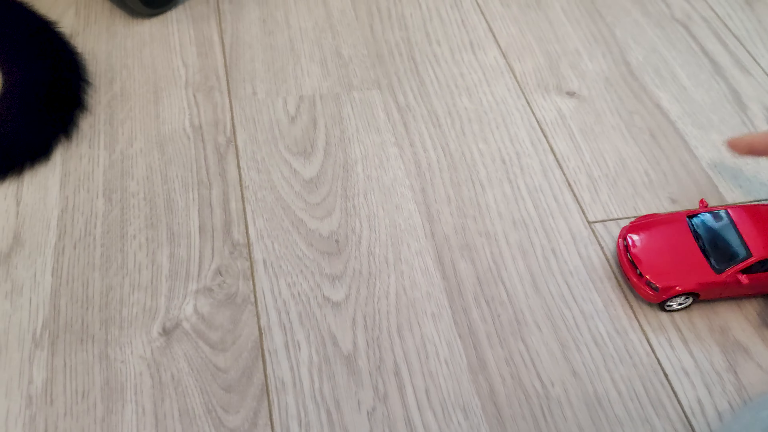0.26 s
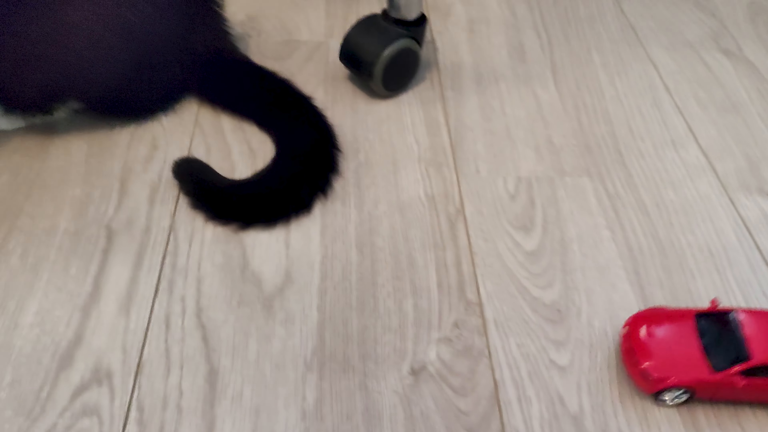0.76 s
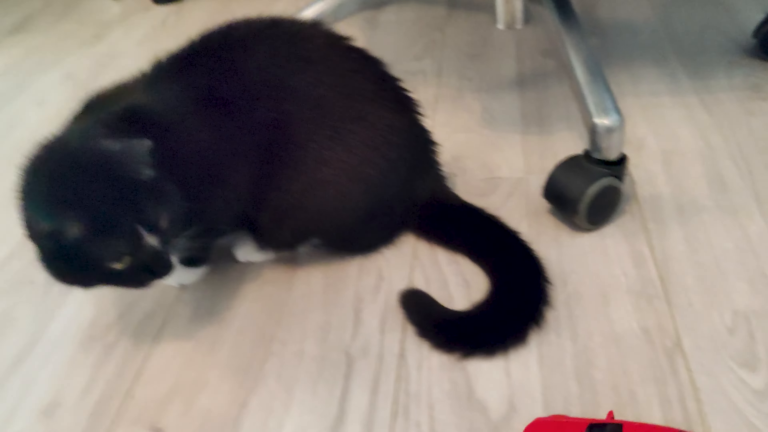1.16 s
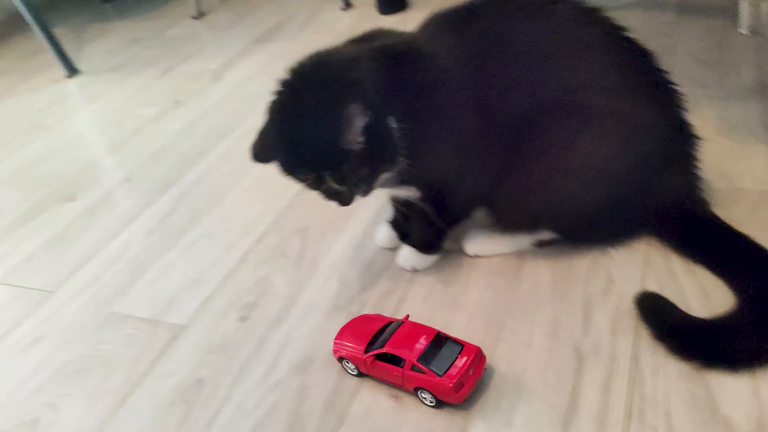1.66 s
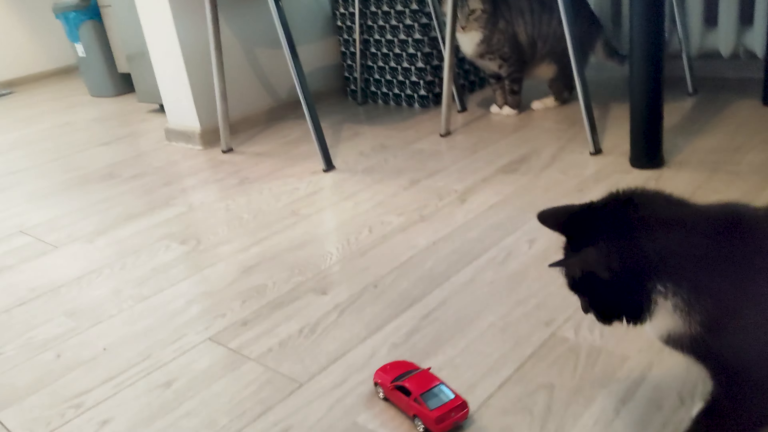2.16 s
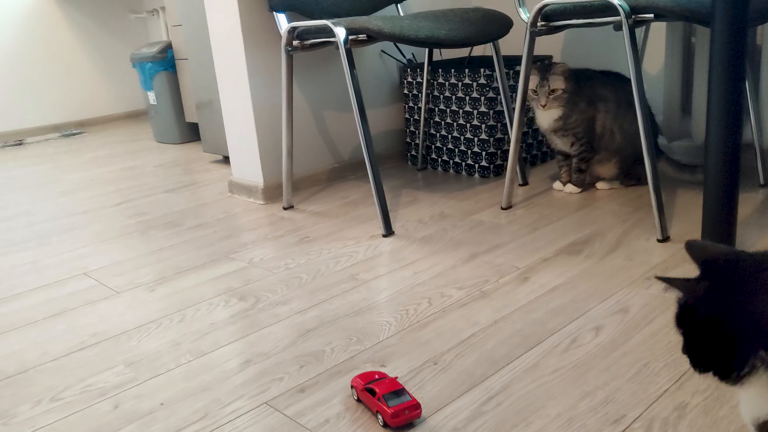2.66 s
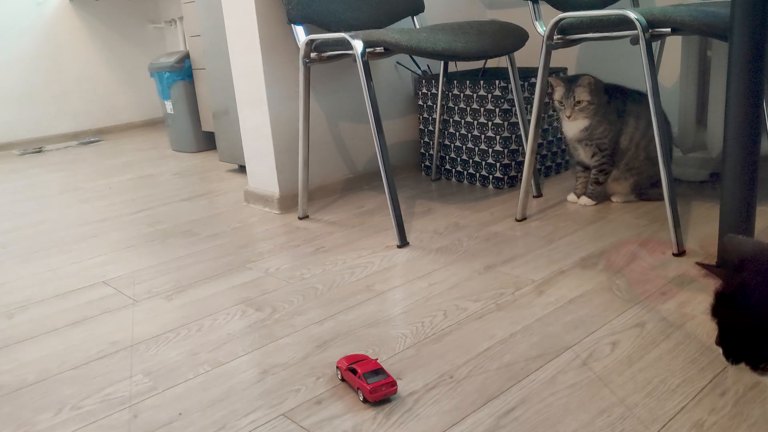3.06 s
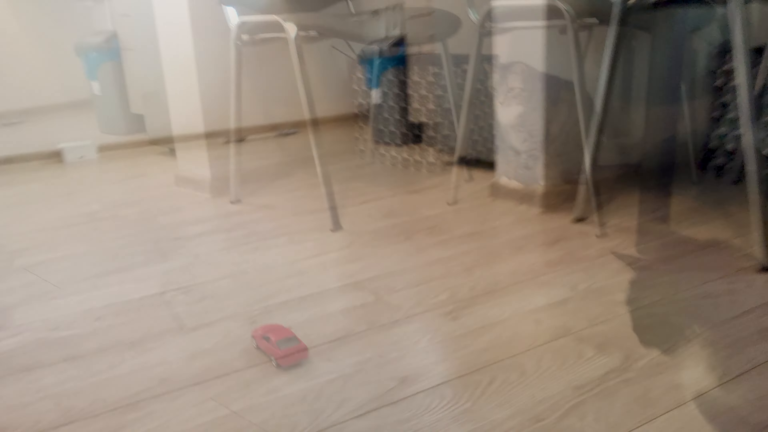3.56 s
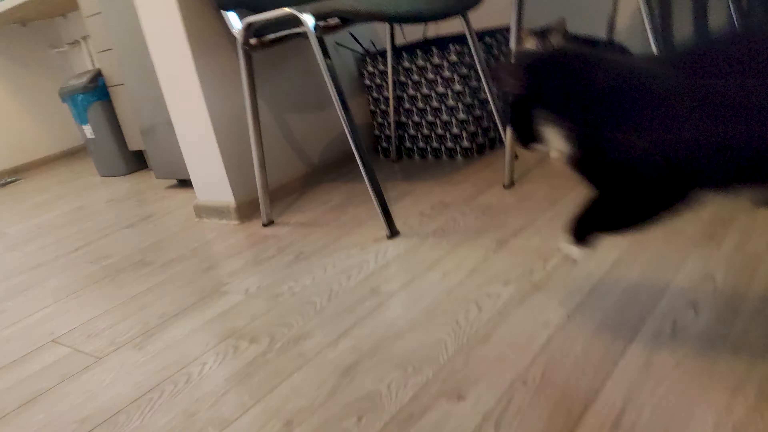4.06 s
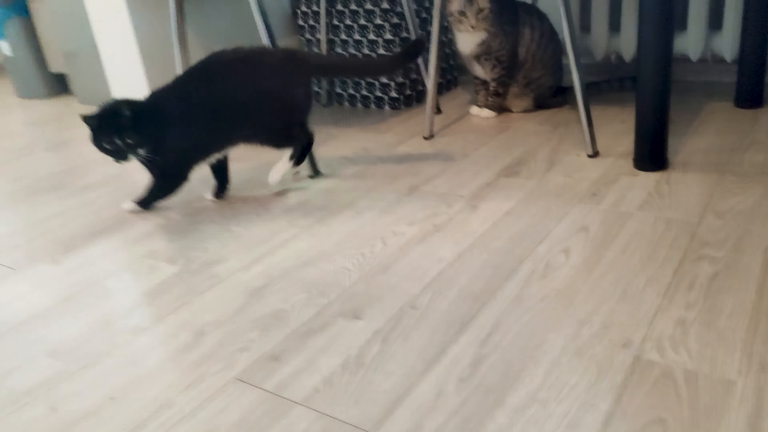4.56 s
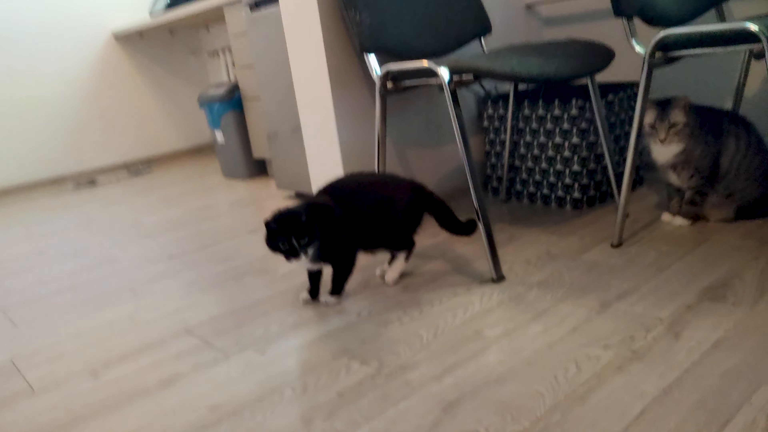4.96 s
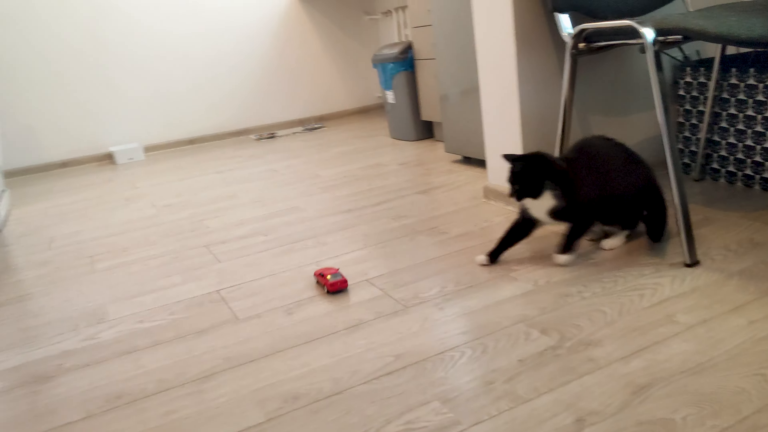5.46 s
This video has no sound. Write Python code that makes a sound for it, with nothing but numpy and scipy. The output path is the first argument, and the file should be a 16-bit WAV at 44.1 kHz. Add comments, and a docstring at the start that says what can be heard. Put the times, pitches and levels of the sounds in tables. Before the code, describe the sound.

At about 0.3 seconds a small toy car is set down on a laminate floor with a few light clacks. From 0.7 seconds it rolls off with a gritty rattle, its hollow body clacking and the boards knocking softly at the joints. The sharpest bumps come between 1.5 and 2.2 seconds. It then slows and grows quieter, ending in faint wheel ticks by 3.3 seconds. From about 3.5 seconds its spring is wound: a few soft clicks, then a quick run of bright ratchet clicks that slow down until 4 seconds. The sound fades to a brief silence. At about 4.5 seconds it cuts back in on a loud, close roll, with rattling and hollow knocks that build until the end at 5.7 seconds. The room has a short, slight echo, and faint hiss and soft microphone handling rumble lie beneath.

```python
"""A small toy car is set down on a laminate floor in a room and rolls off, rattling over the joints.
Grit under the wheels and each bump force its hollow body and the floor boards into resonance.
Its spring ratchet is wound with a run of slowing clicks, each an impact of pawl on tooth.
The sound fades out, then cuts back in on a loud close roll. Faint hiss and rumble lie beneath."""
import sys
import numpy as np
from scipy import signal
from scipy.io import wavfile
from scipy.ndimage import uniform_filter1d

SR = 44100
rng = np.random.default_rng(int(sys.argv[2]) if len(sys.argv) > 2 else 0)


def master(y):
    """Save y as 16-bit WAV."""
    cut = np.clip(np.atleast_2d(y).T, -1, 1)
    pcm = np.round(cut * 32767)  # scale
    wavfile.write(sys.argv[1], SR, pcm.astype(np.int16))


N = 251811
TIME = np.arange(N) / SR


def gain_of(db):
    """Amplitude ratio of a level in decibels."""
    return 10 ** (np.asarray(db) / 20)


def unit_rms(x):
    """Normalisation to unit mean power."""
    return x / np.sqrt(np.mean(x ** 2) + 1e-20)


def at_hz(points, hz):
    """Interpolation on a logarithmic frequency axis."""
    f, value = np.transpose(points)
    return np.interp(np.log(hz + 1), np.log(f + 1), value)


def curves(rows):
    """Linear interpolation in time, one curve for each column after the first."""
    s, *columns = np.transpose(rows)
    return [np.interp(TIME, s, column) for column in columns]


def gated_curves(tables, lead_s=.012):
    """A gate that opens during each table, and the tables' curves."""
    tables = [[(rows[0][0] - lead_s, *rows[0][1:]), *rows] for rows in tables]
    inside = sum((TIME >= rows[0][0]) * (TIME <= rows[-1][0]) for rows in tables)
    return uniform_filter1d(np.minimum(inside, 1.), 64), curves(sum(tables, []))


def filtered(x, order, hz, kind="band"):
    """Causal filtering with a maximally flat passband."""
    return signal.sosfilt(signal.butter(order, hz, kind, fs=SR, output="sos"), x)


def colour(x, spectrum, lo_hz, hi_hz, modes=()):
    """Source-filter principle: x excites a minimum-phase band of unit energy with resonant peaks."""
    hz = abs(np.fft.fftfreq(8192, 1 / SR)) + 1
    peaks = sum(gain_of(db) / (1 + (2 * (hz - f) / width) ** 2) for f, width, db in modes)
    edges = np.sqrt((1 + (lo_hz / hz) ** 36) * (1 + (hz / hi_hz) ** 36))
    log_gain = np.log(gain_of(at_hz(spectrum, hz)) * (1 + peaks) / edges + 1e-5)
    taps = np.fft.ifft(np.exp(log_gain - 1j * signal.hilbert(log_gain).imag)).real[:2048]
    return signal.oaconvolve(x, taps[None] / np.linalg.norm(taps))[:, :N]


def sides(pan_db):
    """Level panning: two gains, the left pan_db above the right."""
    return gain_of(np.array([pan_db / 2, -pan_db / 2]))


def noise_pair(count, correlation):
    """Partial coherence: each microphone faces another side of the shaking shell."""
    a, b = rng.standard_normal((2, count))
    return np.array([a, correlation * a + np.sqrt(1 - correlation ** 2) * b])


def blows(s, db, pan_db, shake_s=.0037, rise_s=.00037, crack_db=-60):
    """Impact excitation: a spike at first contact, then exponentially decaying noise."""
    out, t = np.zeros((2, N + 3000)), np.arange(3000) / SR
    envelope = np.exp(-t / shake_s) * (1 - np.exp(-t / rise_s))
    for at, level_db, side_db in np.broadcast(s, db, pan_db):
        shake = noise_pair(3000, correlation=.11) * envelope
        shake /= np.sqrt((shake ** 2).sum(1, keepdims=True) / (envelope ** 2).sum()) * envelope.max()
        blow = shake + gain_of(crack_db) * (t == 0)
        out[:, round(at * SR):][:, :3000] += gain_of(level_db) * sides(side_db)[:, None] * blow
    return out[:, :N]


def rings(s, db, hz, pan_db, t60):
    """Free vibration: each tap starts a damped sinusoid that rises within a cycle."""
    out, t = np.zeros((2, N + 3000)), np.arange(2000) / SR
    for at, level_db, f, side_db, life in np.broadcast(s, db, hz, pan_db, t60):
        envelope = gain_of(level_db - 60 * t / life) * np.minimum(t * f / .8, 1)
        tone = envelope * np.sin(2 * np.pi * f * t)
        out[:, round(at * SR):][:, :len(t)] += sides(side_db)[:, None] * tone
    return out[:, :N]


# Hiss spectrum. Each row: frequency in Hz, relative level in dB.
HISS_SPECTRUM = [(88, -25.5), (150, -22.5), (439, -23.5), (504, -22), (1260, -25), (1690, -36.5),
                 (1980, -11), (2360, -7.5), (2500, -31.5), (3700, -34), (4000, -11), (9080, -9.5),
                 (16000, -20)]

def noise_floor(hiss_db=-70, hum_db=-93, hum_end_s=3.42):
    """Stationary noise: room and microphone hiss, with a narrow-band hum until the winding starts."""
    hiss = colour(rng.standard_normal((2, N)), HISS_SPECTRUM, 120, 17000)
    hum = unit_rms(filtered(hiss[0], 3, [135, 170])) * (TIME < hum_end_s)
    return gain_of(hiss_db) * hiss + gain_of(hum_db) * hum


# Low wobble, in two stretches. Each row: time in seconds, steady level in dB, thud level in dB.
WOBBLE = [
    [(0.0, -85, -91), (0.24, -75, -99), (0.29, -81, -76), (0.48, -85, -85), (0.54, -88, -100),
     (0.82, -89, -83), (0.89, -86, -97), (1.06, -80, -73), (1.28, -94, -72.5), (1.33, -91, -85),
     (1.55, -88, -67.5), (1.7, -72, -76.5), (2.39, -88, -88), (2.47, -87, -73), (2.57, -89, -89),
     (2.67, -84, -73), (2.76, -83, -102), (2.9, -86, -86), (2.96, -88.5, -97.5), (3.2, -91.5, -92.5),
     (3.4, -100, -83.5), (3.42, -101, -97)],
    [(4.45, -90, -72), (4.474, -83.5, -65), (4.502, -75, -79), (4.576, -80, -48.5), (4.62, -73, -61),
     (4.688, -74, -70), (4.702, -75, -61), (4.776, -74, -62), (4.8, -70, -77), (4.884, -74, -73),
     (4.912, -74, -63), (5.004, -74, -90), (5.092, -83, -71), (5.172, -85, -75), (5.218, -79, -64),
     (5.284, -83, -80), (5.322, -87, -76), (5.376, -87, -87), (5.478, -88, -55), (5.508, -89, -55),
     (5.65, -84, -45), (5.71, -79, -56)],
]
# Soft handling thumps. Each row: centre in seconds, deepest band in dB, hum band in dB.
HANDLING = [(0.051, -71, -100), (0.321, -67, -85), (.44, -92, -71), (0.641, -58, -91), (.9, -66.5, -99),
            (1.3, -93, -78), (1.48, -76, -70.5), (1.6, -72, -94), (1.94, -82, -75), (2.13, -73.5, -75),
            (2.21, -79, -69), (2.34, -84, -80), (2.48, -88, -70), (2.6, -70, -94), (2.77, -77, -99),
            (3.141, -70, -88), (3.93, -76, -97), (4.501, -65, -89), (4.62, -60, -84), (4.7, -51, -85),
            (4.97, -67, -94), (5.1, -69, -90), (5.5, -85, -65), (5.7, -67, -76)]

def rumble(thump_s=.044):
    """Amplitude modulation: low bands of noise wobble, and swell at each handling thump."""
    on, (steady_db, thud_db) = gated_curves(WOBBLE)
    s, *thump_db = np.transpose(HANDLING)
    t = TIME[::100]
    swells = gain_of(thump_db) @ np.exp(-((t - s[:, None]) / thump_s) ** 2)
    deep_swell, hum_swell = (np.interp(TIME, t, swell) for swell in swells)
    apart, common = rng.standard_normal((2, N)), rng.standard_normal(N)
    deep = unit_rms(filtered(apart, 3, [12, 36])) * (gain_of(steady_db) + deep_swell)
    hum = unit_rms(filtered(common + .19 * apart, 3, [50, 110]))
    hum *= gain_of(steady_db - 12.5) + hum_swell
    far, near = (unit_rms(filtered(common + .3 * apart, 4, hz)) for hz in ([148, 320], [142, 223]))
    thud = np.where(TIME < WOBBLE[-1][0][0], far, near)  # deeper when the car runs close
    return on * (deep * sides(5.8)[:, None] + hum + gain_of(thud_db) * thud)


# Vibration in four stretches: set down, rolling away, wound up, rolling close.
# Each row: time in seconds, then shell, treble and board levels in dB.
ROLL_LEVELS = [
    [(.267, -63, -66, -64), (.295, -44, -66, -60), (.33, -43, -68, -56), (.45, -83, -96, -85),
     (.505, -63.5, -51.5, -64.5), (.585, -102, -99, -90), (.66, -66, -62, -79)],
    [(.69, -65, -68, -73), (.75, -45.5, -53, -70), (.87, -50.5, -85, -62), (.93, -46, -50, -66),
     (.97, -47.5, -90, -56.5), (1.12, -43.5, -56, -45.5), (1.25, -48.5, -51, -47), (1.36, -46, -57, -53),
     (1.47, -43.5, -49.5, -47.5), (1.6, -41.5, -50.5, -48), (1.7, -44, -73, -43.5), (1.81, -50, -52, -47.5),
     (1.87, -38, -51.5, -50), (2.0, -51.5, -56, -54.5), (2.16, -37.5, -44, -51), (2.38, -58, -53, -61.5),
     (2.47, -49.5, -51.5, -69), (2.62, -63, -51.5, -68), (2.73, -69, -56, -72), (3.0, -102, -61.5, -105),
     (3.12, -70, -62.5, -89), (3.2, -107.5, -72.5, -104), (3.41, -99, -72.5, -97)],
    [(3.43, -63.5, -57, -65), (3.465, -61, -59, -55.5), (3.506, -58.5, -63, -54.5), (3.56, -61.5, -62, -54),
     (3.63, -61, -56, -67.5), (3.67, -59.5, -52.5, -70.5), (3.724, -60, -56, -83), (3.732, -46.5, -52, -75),
     (3.78, -45, -46, -70), (3.84, -49.5, -47, -64), (3.92, -48, -53.5, -69), (4.01, -51, -55.5, -79),
     (4.05, -65.5, -69, -70), (4.14, -55, -69.5, -110), (4.25, -100, -91, -112)],
    [(4.36, -30.5, -41, -52.5), (4.46, -38, -44.5, -48.5), (4.55, -37.5, -50, -39.5),
     (4.63, -34.5, -49, -40.5), (4.75, -36, -44, -40), (4.87, -35.5, -41.5, -35), (4.91, -32.5, -43.5, -33),
     (4.945, -31, -35.5, -26), (4.99, -29, -38, -32.5), (5.04, -30, -40, -33), (5.09, -27.5, -32, -32.5),
     (5.15, -30.5, -38.5, -32.5), (5.195, -28.5, -34.5, -32.5), (5.225, -26.5, -34, -24),
     (5.27, -28.5, -30, -27.5), (5.34, -28, -33, -34.5), (5.375, -26.5, -31, -30.5),
     (5.41, -22.5, -31, -45), (5.45, -21.5, -27, -34.5), (5.5, -24.5, -32.5, -37.5),
     (5.55, -24.5, -29.5, -32.5), (5.61, -23.5, -31, -33.5), (5.67, -25, -30, -31), (5.71, -28, -29.5, -40)],
]
# Wheel contact. Each row: start in seconds, finest grit over the treble in dB,
# left over right in dB, ratio of smooth rub to taps.
CONTACT = [(0, -28, -1.5, 0.84), (.68, -15, -3.5, 0.96), (2.3, -12.5, -3, 1.1), (3.42, 0.5, -3, 1.5),
           (4.301, -9.5, -2.5, 1.6), (4.88, -9, -1.5, 5.1)]
# The car's place on the boards. Each row: time in seconds, board resonance in Hz, its skirt over
# its core in dB, chassis drone over the shell in dB, hollowness (ring over rattle) in dB.
PLACES = [(.27, 760, 14, -4.5, -7), (.6, 660, 11, 6, -2), (0.749, 640, 27, -6.5, -6),
          (.85, 677, 20, -7, -4), (.95, 713, 15, -10.5, -5), (1.07, 672, 15, -7, -5.5),
          (1.2, 604, 40.5, -6.5, 1), (1.5, 520, 18, -9, -2), (1.75, 526, -19, -18.5, -2.5),
          (2.0, 508, -14, -34, -2), (2.2, 521, -38, -32, -0.5), (2.45, 480, -27, -34, -4),
          (2.64, 500, -39, -32, 6.5), (2.8, 490, -15, -27, -7), (3.1, 453, -8.5, -11.5, -1.5),
          (3.41, 330, -8.5, -23.5, 2), (3.501, 430, -1.5, -23, -1), (3.72, 448, -7, -21, 2),
          (3.8, 617, 3, -20, -9), (4.3, 624, -14.5, -38, -2), (4.459, 521, 16.5, -12.5, -7.5),
          (4.6, 505, 8, -7.5, 0.5), (4.75, 510, 22, -10.5, -4.5), (4.9, 494, -14, -8, 0),
          (5.06, 437, 17.5, -10, -1.5), (5.22, 434, -1.5, -11.5, -2), (5.4, 451, -5.5, -13.5, 0),
          (5.48, 385, 28, -11.5, -3.5), (5.57, 366, 30, -11, -2), (5.67, 318, 20, -12, -0.5)]

def rolling():
    """A moving source: level, side and resonance vary along the car's path."""
    car = {}
    car["on"], (car["shell_db"], car["treble_db"], car["board_db"]) = gated_curves(ROLL_LEVELS)
    start, *contact = np.transpose(CONTACT)
    stretch = np.searchsorted(start, TIME, "right") - 1
    car["fine_db"], car["pan_db"], car["smooth"] = (column[stretch] for column in contact)
    car["board_hz"], car["skirt_db"], car["drone_db"], car["hollow_db"] = curves(PLACES)
    return car


def grit(per_s, spread_db, smooth, decay_s=.0018):
    """Shot noise: wheels meet grain and dust in random, uneven taps over a smoother rub."""
    taps = gain_of(spread_db * np.minimum(rng.exponential(1, N), 2.5)) * (rng.random(N) < per_s / SR)
    chatter = signal.lfilter([1], [1, -np.exp(-1 / (decay_s * SR))], taps)
    envelope = (smooth + unit_rms(chatter)) / np.sqrt(smooth ** 2 + smooth + 1)
    return unit_rms(envelope * noise_pair(N, correlation=.13))


def settling(s, db, settle_s, share_db=-12):
    """Damping: the envelope of loose parts' chatter falls exponentially after each bump."""
    out, t = np.zeros(N + 9000), np.arange(9000) / SR
    for at, level_db, tau in zip(s, db, settle_s):
        out[round(at * SR):][:9000] += gain_of(level_db + share_db) * np.exp(-t / tau)
    return out[:N]


def wander(depth_db=1.5, per_s=30):
    """Random modulation: a gain that makes a part rattle now more, now less."""
    return gain_of(depth_db * np.interp(TIME * per_s, np.arange(600), rng.standard_normal(600)))


def rocking_panels(x, depth_db=3, patch_hz=260, patch_s=.06):
    """Spectral modulation: as the car rocks, other panels take up the shaking, in random patches."""
    hz, t, spectrum = signal.stft(x, SR, nperseg=512, noverlap=384)
    patches = rng.standard_normal((len(t), len(hz))).T
    patches = uniform_filter1d(patches, round(patch_hz / hz[1]), axis=0)
    patches = uniform_filter1d(patches, round(patch_s / t[1]), axis=1)
    gain = unit_rms(gain_of(depth_db * unit_rms(patches)))
    return signal.istft(spectrum * gain, SR, nperseg=512, noverlap=384)[1][:, :N]


# Bumps. Each row: start in seconds, shell level in dB, treble and boards over it in dB each,
# hollowness in dB, settling time in seconds.
JOLTS = [(0.227, -51, -23, -16, -2, 0.026), (0.254, -47, 11.5, -42, 0, 0.0089),
         (0.2572, -41.5, 6, -49, -10, 0.014), (0.2784, -39, -19, -10, -10, 0.022),
         (0.2843, -29.5, 5, -15, 4, 0.014), (0.3008, -36, -13, -30, -7, 0.011),
         (0.3102, -30.5, -3.5, -17.5, 2.5, 0.011), (0.3237, -38, -28, -29, 21, 0.036),
         (0.4895, -42, -11.5, -31, 3, 0.013), (0.6806, -58, -28, -28, 14, 0.02),
         (0.705, -43, -15, -16, 5, 0.041), (0.7354, -32.5, -11, -19, 2, 0.015),
         (0.7534, -36, -17, -13, -2, 0.01), (0.783, -37.5, -11, -42, -11, 0.012),
         (0.807, -44, -23, -33, 11, 0.0091), (0.8241, -35.5, -2.5, -38, 13, 0.017),
         (0.85, -29.5, -8.5, -32, 0, 0.02), (0.9, -32, -8.5, -10, 1, 0.014),
         (0.919, -35, -13, -9, 5.5, 0.011), (0.941, -39, -14, -19.5, 6, 0.012),
         (0.9882, -27.5, -4, -10, 9, 0.026), (1.004, -29, -23, -19, 6, 0.012),
         (1.027, -33, -26, -5, -2, 0.012), (1.049, -31.5, -12, -4.5, 12, 0.0082),
         (1.063, -43, -1, -10, -4, 0.0062), (1.17, -39, -23, -5, 7, 0.0071),
         (1.193, -52, -23, 11, 7, 0.011), (1.2236, -32.5, -8, -9, -5, 0.0088),
         (1.2476, -37, -6.5, -12, 16, 0.031), (1.4063, -33.5, -11, -1.5, -6, 0.0073),
         (1.4182, -29.5, -3.5, -43, 6, 0.017), (1.463, -33, -8, -13, 7, 0.012),
         (1.4757, -25.5, -6.5, -25, 8, 0.0058), (1.5336, -20.5, -17, -23, 16, 0.016),
         (1.5494, -36, -10, 4, -3, 0.019), (1.573, -36, -18, -13, 1, 0.012),
         (1.5823, -24, -27, -12, 6, 0.012), (1.6108, -32.5, -15, -6, -13, 0.0087),
         (1.7217, -32, -1.5, -18, 3, 0.02), (1.7345, -26.5, -6, -8, 7, 0.013),
         (1.763, -28.5, -8.5, -17, 10, 0.0083), (1.8466, -40, -9, -19, 20, 0.022),
         (1.871, -44, -12, -28, 5, 0.01), (1.905, -44, -35, -13, 7, 0.012),
         (1.948, -65, 19.5, -21, 3, 0.017), (1.992, -40, -11, -26, -5, 0.011),
         (2.0498, -26, -12, -8.5, 4, 0.018), (2.0634, -28.5, -4, -1.5, 1, 0.028),
         (2.2009, -22, -48, -21, 1, 0.043), (2.416, -39, -19, -59, 15, 0.047),
         (2.454, -40, -6, -10, 7, 0.041), (2.4831, -38.5, -7, -3.5, -3, 0.015),
         (2.6525, -33, -8, -17, -7, 0.011), (2.669, -43, -3, -17, 1, 0.011),
         (3.0954, -71, -2, -18, 9.5, 0.023), (4.495, -28, -18, -5, -13, 0.0068),
         (4.565, -24, -11.5, -3, -6, 0.0089), (4.5727, -30, -1.5, -18, 13, 0.039),
         (4.6603, -26, -3, -0.5, -4, 0.0066), (4.7107, -25.5, 3.5, 1.5, 17, 0.0049),
         (4.838, -32.5, -4.5, -30, -5, 0.015), (4.9082, -29, 0, -11, 20, 0.011),
         (5.1034, -24, -22, 4, 12, 0.013), (5.132, -19.5, -13, -8, 7, 0.016),
         (5.153, -25, -2, -8, 3, 0.015), (5.2325, -26.5, -4.5, -3, -14, 0.012),
         (5.3028, -26.5, -2, 3, 9, 0.012), (5.3636, -25.5, -11, 10, -5, 0.015),
         (5.3975, -17, -8, -3.5, -4, 0.036), (5.4526, -19.5, -18, -14, -9, 0.0068),
         (5.471, -26, -21, -2, -2, 0.0074), (5.5289, -22, -7, -30, -13, 0.02),
         (5.56, -29, -5, -17, -4, 0.01), (5.652, -23, -9, -12, -2, 0.013)]
# Response of the car's body. Each row: frequency in Hz, relative level in dB.
BODY_SPECTRUM = [(410, -38), (700, 5.5), (1110, 0), (2220, -9.5), (3070, -6.5), (3740, -7.5), (4670, -1.5),
                 (6230, -1.5), (9730, -21), (12200, -20.5), (14800, -37.5), (15400, -31.5), (16000, -61.5)]
# Shell resonances. Each row: frequency in Hz, width in Hz, strength in dB.
SHELL_MODES = [(1860, 88, -12), (2179, 56, -1.5), (2580, 34, -8), (2850, 45, -7), (3650, 45, -6),
               (4307, 250, 7.5), (5950, 92, -6.5), (7350, 800, 1)]

def car_body(car, treble_lean=.34, scatter_db=3):
    """Forced vibration: one drive of grit and bumps shakes shell, loose parts, axles and chassis."""
    s, hit_db, bright_db, weight_db, hollow_db, settle_s = np.transpose(JOLTS)
    at = (s * SR).astype(int)
    shell_db, treble_db = car["shell_db"], car["treble_db"]
    side_db = car["pan_db"][at] - scatter_db * rng.standard_normal(len(s))
    tilt_db = (car["hollow_db"][at] + hollow_db) / 2
    ring_db = shell_db - 5.5 + car["hollow_db"] / 2
    rattle_db = shell_db - 4 - car["hollow_db"] / 2 + treble_lean * (treble_db - shell_db)
    drone_bump_db = .81 * car["drone_db"][at] + .55 * weight_db - .5
    # Each row: rolling level in dB, share of a bump in dB, band edges in Hz, resonances.
    parts = [(ring_db, tilt_db - 9.5, 1585, 2508, SHELL_MODES),
             (rattle_db, treble_lean * bright_db - tilt_db - 3, 2364, 3910, SHELL_MODES),
             (treble_db, bright_db + .5, 4800, 8840, SHELL_MODES),  # fizz
             (treble_db + car["fine_db"], bright_db - 11.5, 8190, 25750, ()),  # finest grit
             (shell_db + car["drone_db"], drone_bump_db, 756, 1500, ())]
    drive = car["on"] * sides(car["pan_db"]) * grit(per_s=220, spread_db=3.5, smooth=car["smooth"])
    bumps = roll = 0
    for roll_db, share_db, *band in parts:
        peak_db = hit_db + share_db
        shake = (gain_of(roll_db) + settling(s, peak_db, settle_s)) * wander() * drive
        roll += colour(shake, BODY_SPECTRUM, *band)
        bumps += colour(blows(s, peak_db, side_db, crack_db=9.5), BODY_SPECTRUM, *band)
    return bumps + rocking_panels(roll)


# Small loose plastic parts. Each row: natural frequency in Hz, relative level in dB.
LOOSE_PARTS = [(1620, 0.5), (1800, -1.5), (2050, 0), (2300, -0.5), (2650, 0), (2900, -2.5), (3350, -3.5),
               (3750, -3), (4300, 0), (5200, -8), (6000, -7.5)]

def loose_parts(car, per_s=200, per_bump=3):
    """Natural frequencies: parts ring at their own pitches, at random in a roll and at every bump."""
    at = np.flatnonzero((rng.random(N) < per_s / SR) & (car["on"] > .5))
    bump_s, bump_db = np.repeat(np.array(JOLTS)[:, :2], per_bump, axis=0).T
    s = np.r_[at / SR, bump_s]
    pick, detune, softness, side, late = rng.random((len(s), 5)).T
    hz, part_db = np.array(LOOSE_PARTS)[(pick * len(LOOSE_PARTS)).astype(int)].T
    spread_db = -.5 * (1 + np.log(softness + .074))
    db = np.r_[car["shell_db"][at] + 2.5, bump_db - 5] + part_db + spread_db
    pan_db = car["pan_db"][(s * SR).astype(int)] + 8 * (side - .5)
    return rings(s + .003 * late, db, hz * (1 + .08 * detune), pan_db, t60=.017)


def cabin(x, car, lo_hz=1980, hi_hz=2350, t60=.38):
    """Cavity resonance: the cabin hums on after each shake, more where the car sounds hollow."""
    t = np.arange(SR // 2) / SR
    hum = filtered(rng.standard_normal((2, len(t))) * gain_of(-60 * t / t60), 3, [lo_hz, hi_hz])
    hum *= np.sqrt(2 * (hi_hz - lo_hz) / SR) / np.linalg.norm(hum[0])
    return signal.fftconvolve(x * gain_of(.5 + car["hollow_db"]), hum, axes=1)[:, :N]


def resonate(x, hz, width_hz):
    """Heterodyne resonance: three times over, shift the curve hz to zero, smooth and shift back."""
    carrier = np.exp(2j * np.pi * np.cumsum(hz) / SR)
    for width in (width_hz, width_hz, 1.19 * width_hz):
        pole = np.exp(-np.pi * width / SR)
        x = 2 * (carrier * signal.lfilter([1 - pole], [1, -pole], x / carrier + 1e-18)).real
    return x * np.sqrt(SR / (1.92 * width_hz))


def boards(car):
    """Plate resonance: the floating boards ring in a hollow band that drifts as the car moves."""
    s, hit_db, _, weight_db, _, settle_s = np.transpose(JOLTS)
    peak_db = hit_db + weight_db + .5
    envelope = (gain_of(car["board_db"]) + settling(s, peak_db, settle_s)) * car["on"]
    push = envelope * grit(per_s=91, spread_db=3, smooth=2.7)[0] + blows(s, peak_db - 5.5, 0)[0]
    core = resonate(push, car["board_hz"], width_hz=120)
    skirt = resonate(push, car["board_hz"], width_hz=330)
    ring = (core + gain_of(car["skirt_db"]) * skirt) / (1 + gain_of(car["skirt_db"]))
    band = signal.butter(4, [295, 980], "band", fs=SR, output="sos")
    return signal.sosfiltfilt(band, ring) * sides(.34 * car["pan_db"])


# Decay of the room. Each row: frequency in Hz, reverberation time in seconds.
ROOM_T60 = [(300, 0.2), (1000, 0.073), (1600, 0.38), (2150, 0.18), (3000, 0.4), (8000, 0.3), (15000, 0.085)]

def room(x):
    """Reverberation: sparse reflections, distinct for each side, die at each band's own rate."""
    taps = np.zeros((2, SR // 2))
    at = np.arange(200, SR // 2 - 20, 20) + rng.integers(0, 20, (2, (SR // 2 - 201) // 20))
    np.put_along_axis(taps, at, rng.choice([-1., 1.], at.shape), 1)
    hz, t, spectrum = signal.stft(taps, SR, nperseg=256)
    decay = gain_of(-60 * t / at_hz(ROOM_T60, hz)[:, None])
    tail = signal.istft(spectrum * decay, SR, nperseg=256)[1]
    return signal.fftconvolve(x.mean(0)[None], tail / np.linalg.norm(tail[0]), axes=1)[:, :N]


def struck(table, car):
    """Impulse response: each row rings one damped mode, panned towards the car."""
    s, db, hz, t60 = np.transpose(table)
    return rings(s, db, hz, car["pan_db"][(s * SR).astype(int)] / 2, t60)


# Wheel drops. Each row: start in seconds, level in dB, pitch in Hz, 60 dB decay time in seconds.
WHEEL_DROPS = [(.2792, -28, 855, .012), (.2846, -24, 840, 0.014), (.3008, -33.5, 716, 0.014),
               (.3108, -27.5, 915, .011), (.324, -37, 773, .02), (.899, -41, 910, 0.023),
               (.987, -44, 680, .03), (1.06, -32.5, 645, 0.033), (1.19, -32, 680, 0.022),
               (1.407, -44, 566, .018), (1.418, -43, 580, .025), (1.531, -26.5, 611, 0.023),
               (1.557, -31, 580, 0.028), (1.581, -33, 605, 0.026), (1.611, -33, 580, 0.023),
               (1.72, -33, 487, 0.033), (2.064, -39, 550, 0.038), (2.199, -49, 530, .025),
               (2.481, -45, 496, .025), (4.495, -25.5, 495, .018), (4.571, -23.5, 494, 0.028),
               (4.66, -21.5, 473, 0.025), (4.71, -23, 507, .02), (4.837, -32, 450, .025),
               (4.908, -27, 517, .02), (5.102, -16, 580, 0.029), (5.232, -24.5, 454, 0.043),
               (5.301, -29, 460, .02), (5.363, -29, 466, .025), (5.398, -26, 800, 0.017)]

def wheel_knocks(car):
    """Impact on a damped plate: a dropping wheel draws a short hollow knock from the boards."""
    return filtered(struck(WHEEL_DROPS, car), 3, 330, "high")


# Panel clacks. Each row: start in seconds, level in dB, pitch in Hz, 60 dB decay time in seconds.
PANEL_CLACKS = [(0.6809, -47, 1580, 0.03), (0.7028, -38, 2760, 0.03), (0.7372, -30, 2590, 0.041),
                (0.7554, -41, 3690, 0.026), (0.7836, -41, 3500, 0.03), (0.8056, -32, 1720, 0.037),
                (0.8239, -29, 2850, 0.03), (0.8495, -32, 2850, 0.027), (0.9004, -35, 3360, 0.03),
                (0.9173, -31.5, 1614, 0.036), (0.9388, -41, 4060, 0.03), (0.9882, -30, 1534, 0.071),
                (1.0495, -37, 2850, 0.033), (1.2231, -41, 3660, 0.03), (1.2469, -36, 3270, 0.03),
                (1.2705, -37, 1780, 0.046), (1.4192, -31, 2560, 0.026), (1.4426, -42, 2520, 0.03),
                (1.4611, -29, 2170, 0.023), (1.4749, -27.5, 2650, 0.03), (1.5334, -26, 1790, 0.036),
                (1.5823, -26, 2030, 0.033), (1.6112, -33, 1750, 0.027), (1.6487, -34, 1690, 0.033),
                (1.6761, -29.5, 1690, 0.03), (1.725, -25, 1720, 0.021), (1.7345, -24, 1677, 0.026),
                (1.7539, -29, 2215, 0.033), (1.8467, -36, 1570, 0.034), (1.8696, -32, 1560, 0.046),
                (1.9061, -32.5, 2160, 0.03), (1.9939, -36, 2030, 0.03), (2.0492, -20.5, 2080, 0.023),
                (2.2009, -21.5, 2020, 0.031), (2.2662, -34.5, 1800, 0.033), (2.4828, -35.5, 1860, 0.038),
                (2.6534, -29.5, 2160, 0.027), (4.0223, -29, 2050, 0.03), (4.4957, -25, 2390, 0.028),
                (4.565, -25, 3340, 0.027), (4.6608, -26, 3740, 0.03), (4.7097, -29, 1730, 0.027),
                (5.023, -28.5, 2050, 0.033), (5.1327, -26, 3700, 0.03), (5.1527, -21, 3290, 0.033),
                (5.2011, -25, 2530, 0.03), (5.219, -25, 2470, 0.03), (5.2335, -19, 2210, 0.03),
                (5.2784, -20.5, 1790, 0.021), (5.3028, -21.5, 1970, 0.022), (5.3637, -22, 3750, 0.04),
                (5.3971, -24, 3810, 0.03), (5.4524, -16.5, 2180, 0.064), (5.5298, -16.5, 2880, 0.028)]

def panel_clacks(car):
    """Modal vibration: one panel of the shell at a time clacks at its own pitch."""
    return struck(PANEL_CLACKS, car)


# Last ticks of the slowing wheels. Each entry: start in seconds.
WHEEL_TICKS = [2.795, 2.896, 2.971, 3.009, 3.054, 3.096, 3.161, 3.2, 3.259, 3.321]

def wheel_ticks(first_db=-49.5, fade_db_per_s=11):
    """Impulsive excitation: ever weaker ticks ring the shell's high modes as the wheels run down."""
    s = np.array(WHEEL_TICKS)
    ticks = blows(s, first_db - fade_db_per_s * (s - s[0]), 0, crack_db=8)
    return colour(ticks, BODY_SPECTRUM, 4800, 8840, SHELL_MODES)


# Ratchet teeth. Each row: start in seconds, tick level in dB, offset for the shell's share in dB.
TEETH = [(3.472, -52, -10), (3.496, -46.5, -15), (3.5188, -45, -11), (3.5773, -46, -14), (3.616, -42, -14),
         (3.7288, -29.5, -10.5), (3.7421, -32.5, -7), (3.76, -25.5, -9), (3.7754, -29, -12),
         (3.7908, -30, -6.5), (3.8052, -29.5, -7.5), (3.8234, -31, -7.5), (3.8427, -26.5, -8.5),
         (3.8603, -31.5, -10), (3.8786, -31, -7.5), (3.906, -27.5, -8), (3.9344, -26, -12),
         (3.9673, -30.5, -8.5), (4.0228, -30.5, -6)]
# Response of the pawl. Each row: frequency in Hz, relative level in dB.
PAWL_SPECTRUM = [(710, -52.5), (1200, -13.5), (1950, 1.5), (2650, 0), (3110, 3.5), (5180, -12),
                 (7250, -1.5), (8260, -6.5), (11300, -9), (14700, -14.5), (16000, -14)]
# Pawl resonances. Each row: frequency in Hz, width in Hz, strength in dB.
PAWL_MODES = [(1983, 270, 8.5), (6900, 1100, -2.5), (11400, 1500, -3.5)]

def ratchet(pan_db=-5, shell_hz=1990):
    """An impact train: at each tooth the pawl gives a bright tick and rings the shell."""
    s, tick_db, offset_db = np.transpose(TEETH)
    shell_db = tick_db + offset_db
    hz = shell_hz * rng.uniform(.894, 1.05, len(s))
    out = rings(s + .0012, shell_db - 7, hz, pan_db, t60=.018)
    tick, knock, top = (tick_db, 4500, 9000), (shell_db + 6.5, 1050, 4500), (tick_db - 4, 9000, 17000)
    for db, lo_hz, hi_hz in (tick, knock, top):
        clicks = blows(s, db, pan_db, shake_s=.0017, crack_db=11.5)
        out += colour(clicks, PAWL_SPECTRUM, lo_hz, hi_hz, PAWL_MODES)
    return out


def scene():
    """Superposition: toy and floor add to their reverberation and the background noise."""
    car = rolling()
    clatter = filtered(loose_parts(car) + panel_clacks(car), 6, 1480, "high")  # small parts: no bass
    toy = car_body(car) + clatter + wheel_ticks() + ratchet()
    floor = boards(car) + wheel_knocks(car)
    toy += cabin(toy, car)
    reverberation = room(gain_of(-7.5) * toy + gain_of(-4) * floor)
    return gain_of(-3.5) * toy + floor + reverberation + noise_floor() + rumble()


# Suppressor threshold. Each row: frequency in Hz, level per bin in dB.
THRESHOLD = [(150, -90), (300, -47), (1000, -66.5), (1420, -41), (1560, -47), (2200, -58), (3200, -41.5),
             (4000, -64)]

def suppressor(x, floor_db=-16):
    """Downward expansion: bands that sink under a threshold are turned down further."""
    hz, _, spectrum = signal.stft(x, SR, nperseg=1024, noverlap=768)
    power = (abs(spectrum * 512) ** 2).mean(0)
    power = uniform_filter1d(uniform_filter1d(power, 5, axis=0), 3, axis=1)
    threshold = gain_of(at_hz(THRESHOLD, hz))[:, None] ** 2
    gain = np.maximum(power / (power + threshold), gain_of(floor_db))
    return signal.istft(spectrum * gain, SR, nperseg=1024, noverlap=768)[1][:, :N]


# Lag of the left microphone. Each row: time in seconds, delay in samples.
LEFT_LAG = [(0, 7), (1.3, 6), (1.6, 0), (2.9, 0), (3.1, 18), (4.4, 17), (4.45, 8), (5.0, -1), (5.71, -2)]
# The fade out and the cut back in. Each row: time in seconds, gain in dB.
FADE = [(0, 0), (4.05, 0), (4.15, -4), (4.24, -14), (4.3, -70), (4.4503, -90), (4.4508, 0), (5.71, 0)]

def record(dry, edge_hz=15900):
    """Path difference delays one of two spaced microphones; suppressor, fader and low-pass follow."""
    delayed = np.arange(N) - np.round(curves(LEFT_LAG)[0]).astype(int)
    microphones = np.array([dry[0][np.clip(delayed, 0, N - 1)], dry[1]])
    faded = suppressor(microphones) * gain_of(curves(FADE)[0])
    low_pass = signal.firwin(511, edge_hz, window=("kaiser", 9), fs=SR)
    return signal.oaconvolve(faded, low_pass[None], "same")


dry = scene()
out = record(dry)
master(out)
```